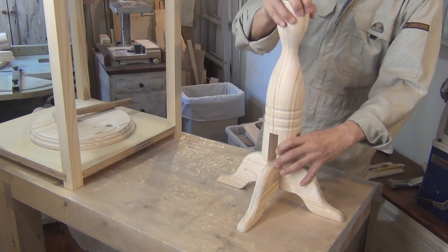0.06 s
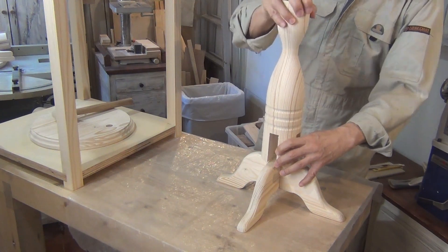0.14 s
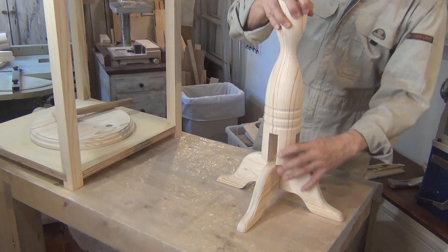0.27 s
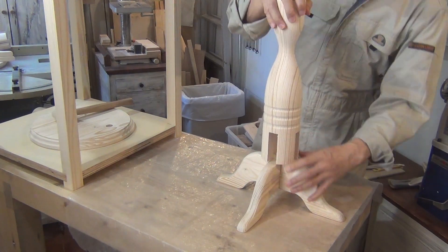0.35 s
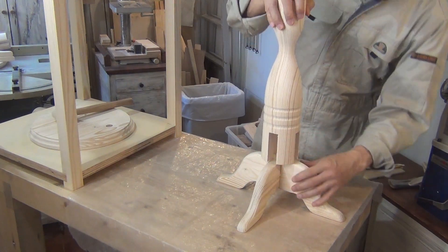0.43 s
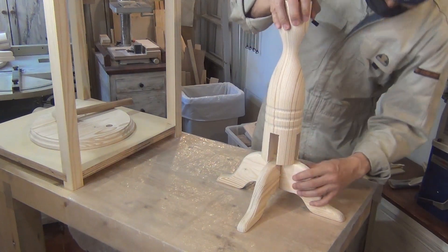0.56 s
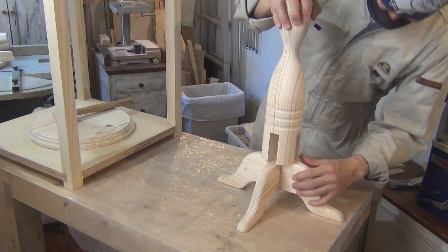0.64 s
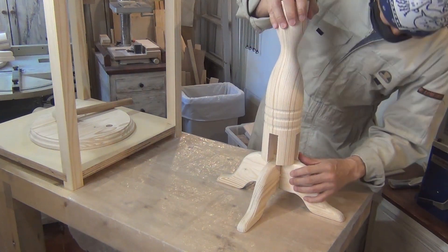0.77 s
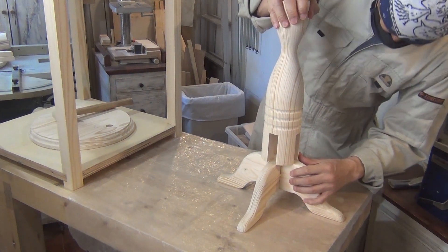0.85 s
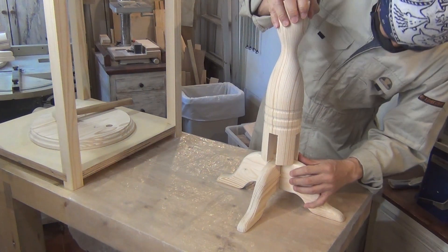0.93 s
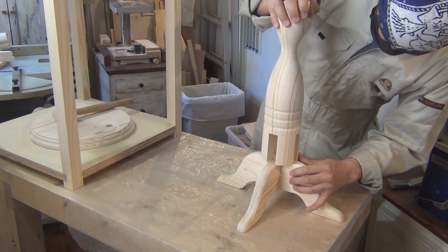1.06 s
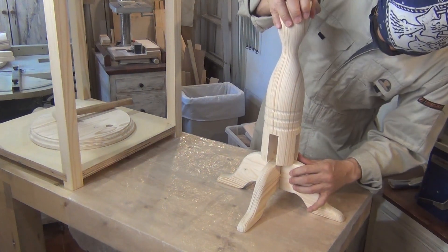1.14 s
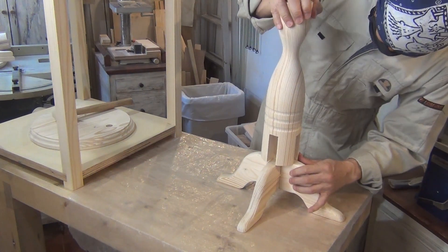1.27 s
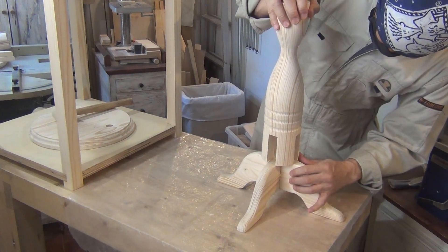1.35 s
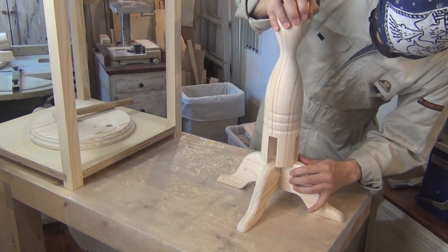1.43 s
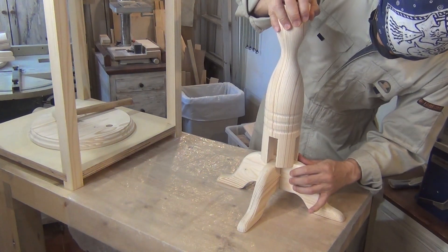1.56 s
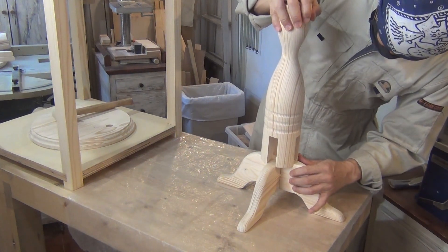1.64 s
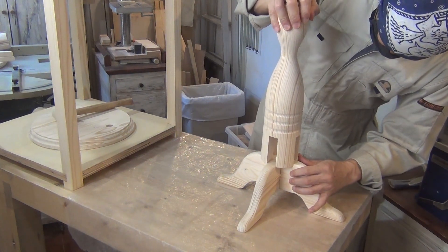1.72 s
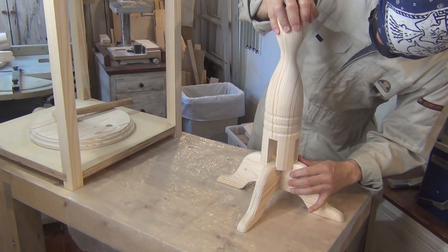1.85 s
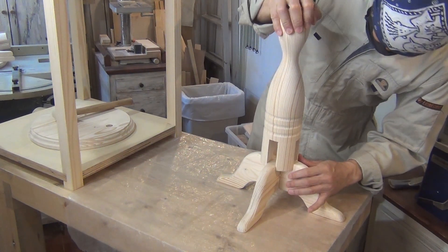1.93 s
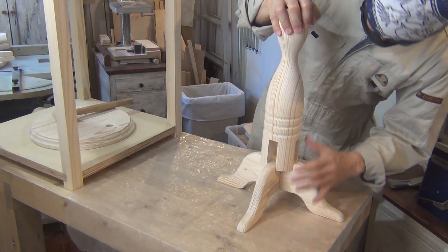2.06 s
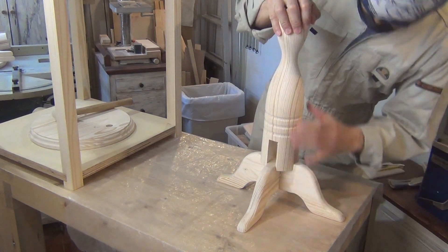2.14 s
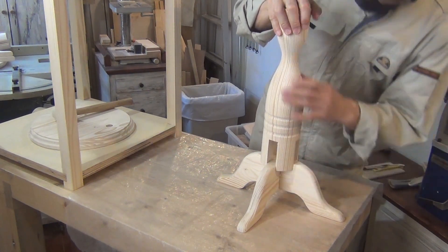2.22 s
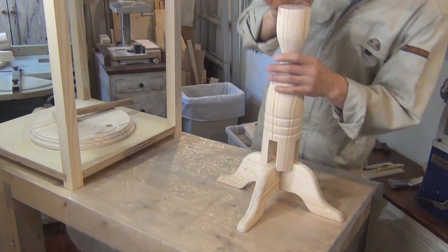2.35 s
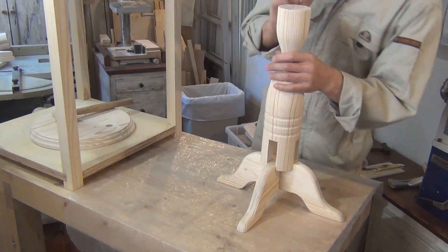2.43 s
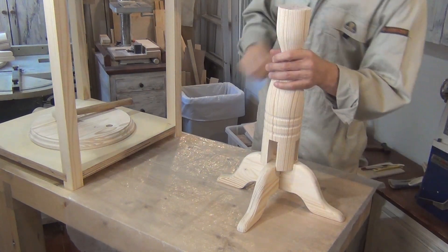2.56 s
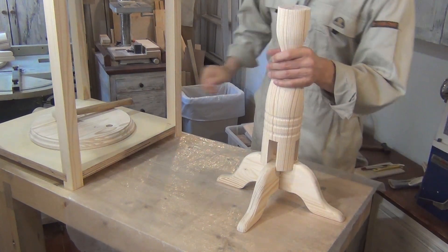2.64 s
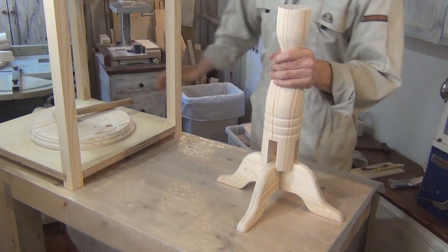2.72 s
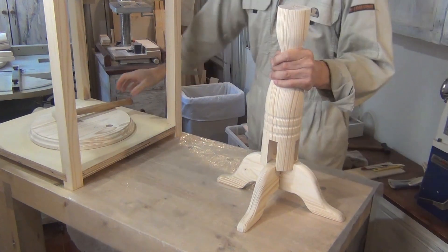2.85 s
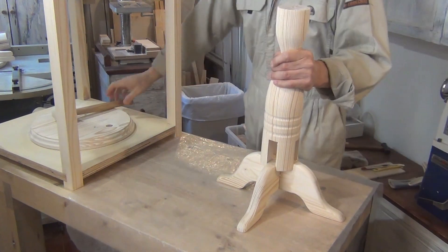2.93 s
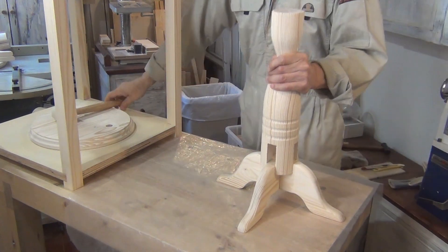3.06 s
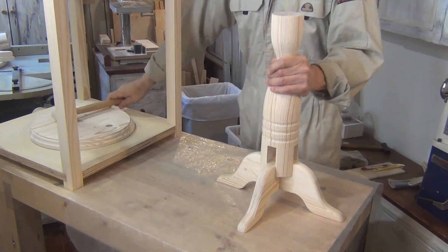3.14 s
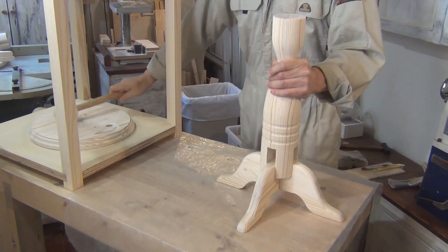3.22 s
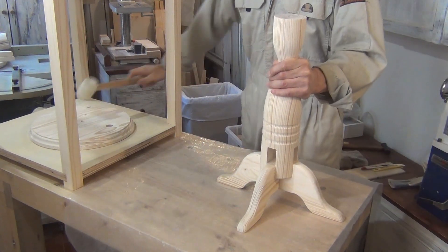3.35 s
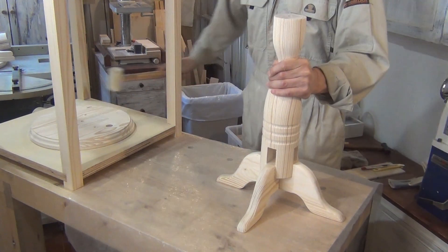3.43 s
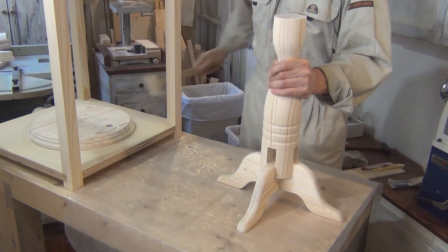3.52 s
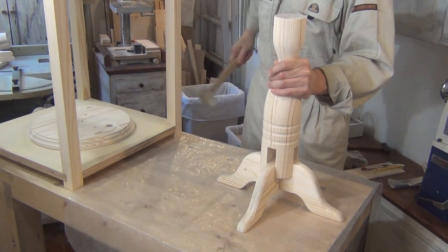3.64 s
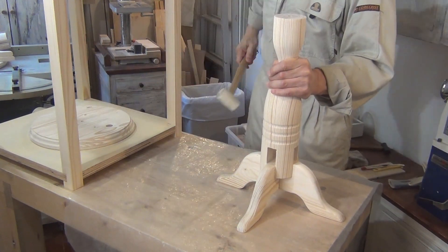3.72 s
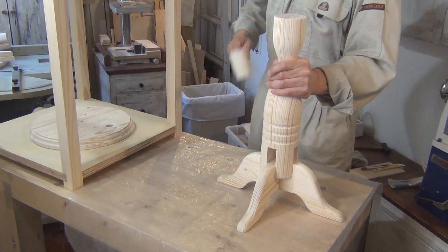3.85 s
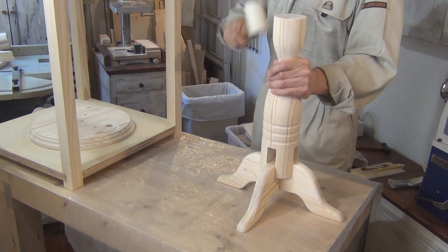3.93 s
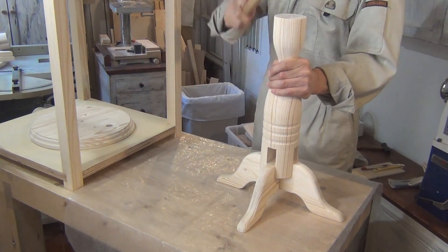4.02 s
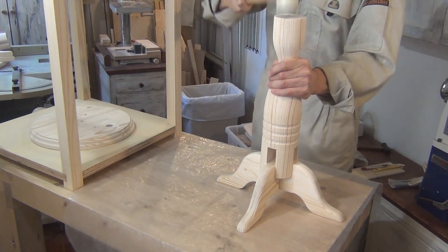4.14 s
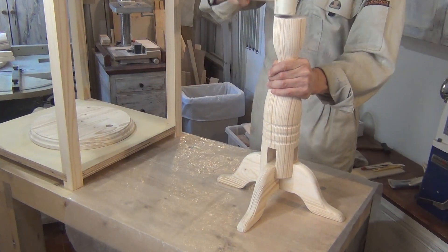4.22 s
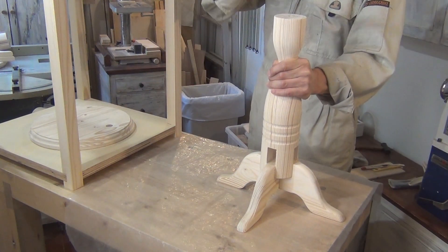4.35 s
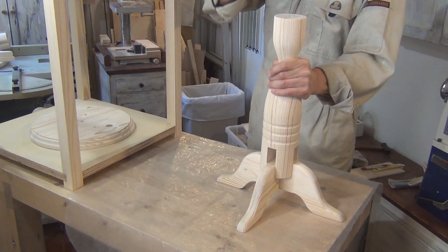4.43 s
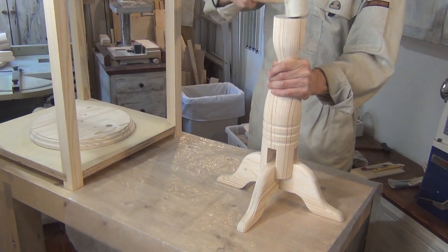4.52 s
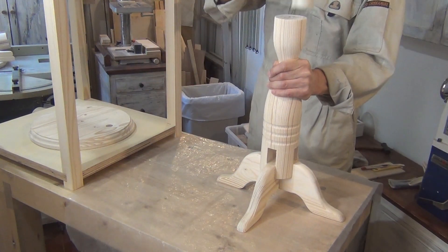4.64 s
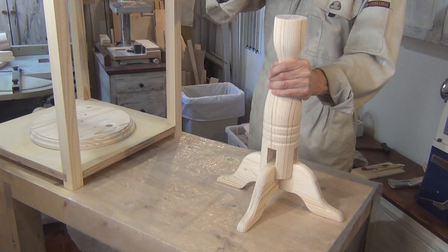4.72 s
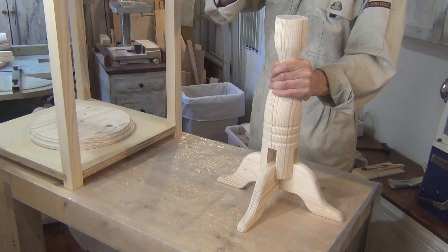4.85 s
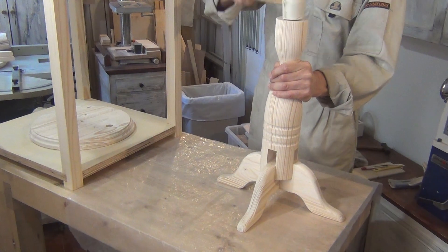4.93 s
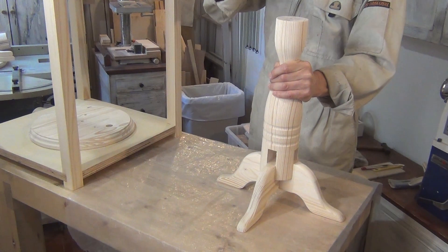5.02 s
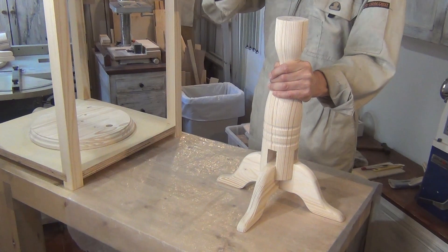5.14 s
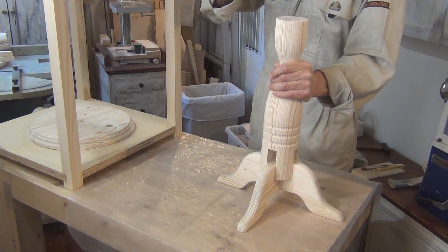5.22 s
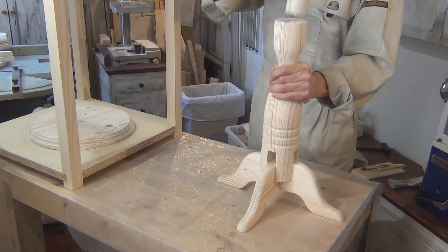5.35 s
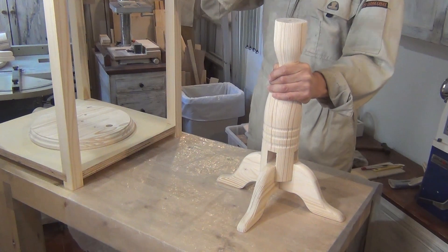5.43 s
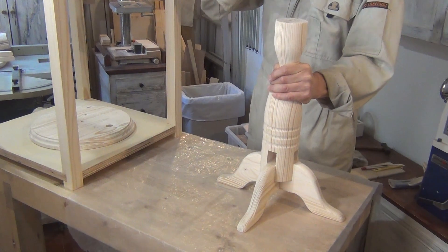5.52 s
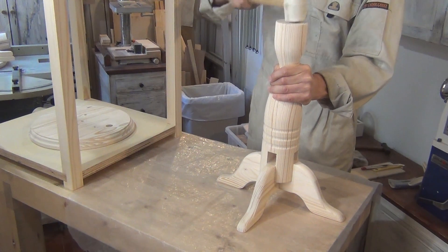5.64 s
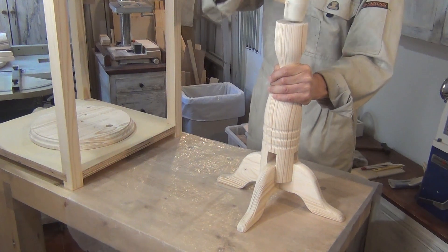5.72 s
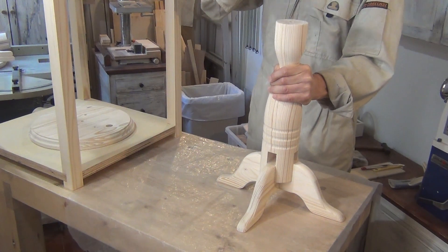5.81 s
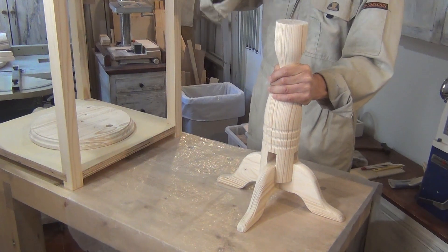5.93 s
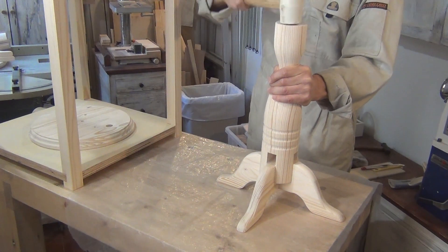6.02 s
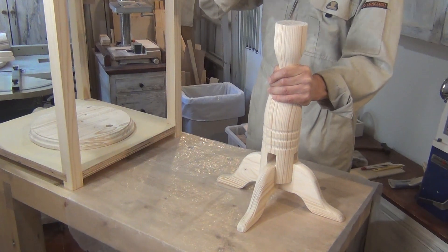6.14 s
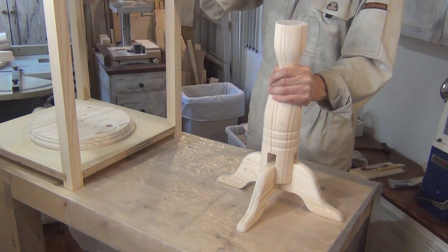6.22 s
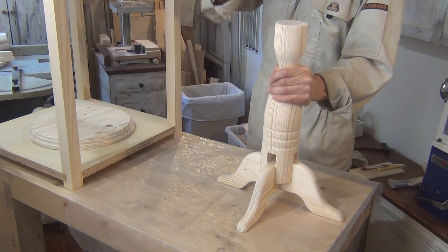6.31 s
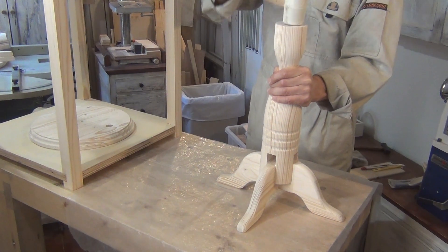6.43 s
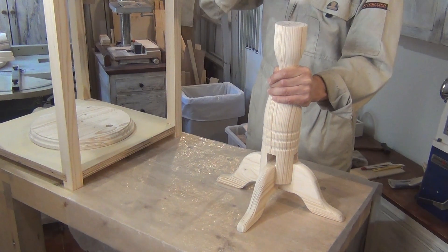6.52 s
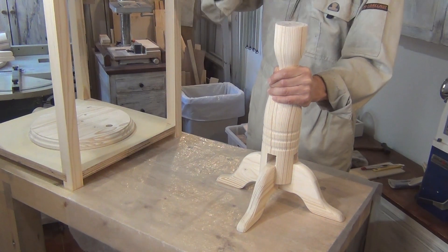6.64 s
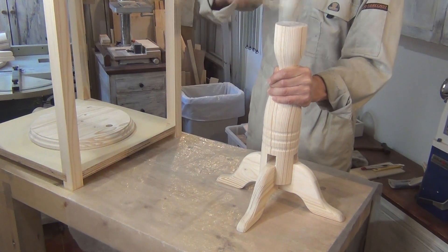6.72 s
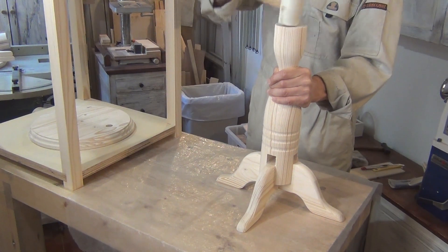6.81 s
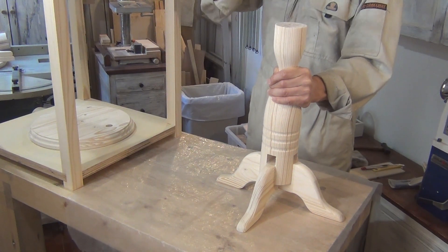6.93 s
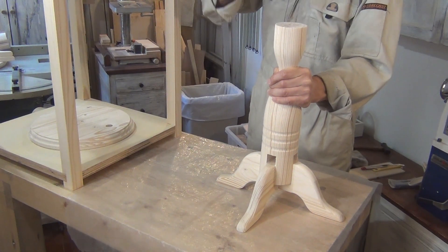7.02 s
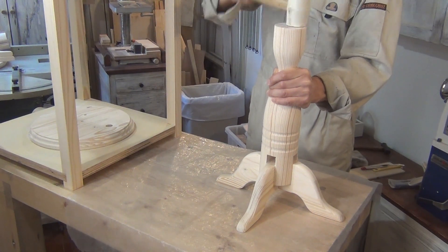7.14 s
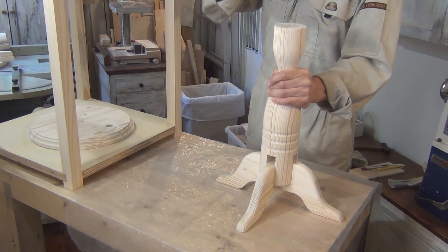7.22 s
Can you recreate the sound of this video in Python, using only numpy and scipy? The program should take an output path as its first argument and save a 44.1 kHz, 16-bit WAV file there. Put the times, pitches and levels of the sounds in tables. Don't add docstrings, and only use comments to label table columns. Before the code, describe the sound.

In a small humming workshop, soft brushing and short scrapes on wood give way to nine hard mallet knocks with faint steel ringing.

```python
import sys
import numpy as np
from scipy import signal
from scipy.fft import rfft, irfft, next_fast_len
from scipy.io import wavfile
from scipy.ndimage import uniform_filter1d, minimum_filter1d, map_coordinates

SR = 44100
rng = np.random.default_rng(int(sys.argv[2]) if len(sys.argv) > 2 else 0)


def bounce(signal):
    frames = np.transpose(np.atleast_2d(signal))
    limited = np.clip(frames, -1, 1)
    pcm = np.round(limited * 32767).astype(np.int16)
    wavfile.write(sys.argv[1], SR, pcm)


def volts_from_decibels(level):
    exponent = np.asarray(level, float) / 20
    return 10 ** exponent


N = 320607


def unit(x):
    return x / np.sqrt(np.mean(x ** 2) + 1e-20)


def along(points, hz):
    f, v = np.transpose(points)
    return np.interp(np.log(hz + 1), np.log(f + 1), v)


def curves(rows):
    s, *cols = np.transpose(rows)
    return [np.interp(np.arange(N) / SR, s, c) for c in cols]


def inside(rows):
    t = np.arange(N) / SR
    return np.clip(np.minimum(t - rows[0][0], rows[-1][0] - t) / 0.0077, 0, 1)


def wobble(rate, count=N):
    knots = rng.standard_normal(int(count * rate / SR) + 4)
    return map_coordinates(knots, [np.arange(count) * rate / SR])


def filtered(x, response):
    m = next_fast_len(x.shape[-1] + SR // 4)
    return irfft(rfft(x, m) * response(np.fft.rfftfreq(m, 1 / SR)), m)[..., :x.shape[-1]]


def resonances(peaks):
    def mode(f, k, centre, width, db):
        return (-1) ** k * volts_from_decibels(db) * 1j * f * width / (centre * centre - f * f + 1j * f * width)
    return lambda f: sum(mode(f, k, *peak) for k, peak in enumerate(peaks))


def spread(pair, width):
    side = filtered(pair[1], lambda hz: volts_from_decibels(along(width, hz)))
    return np.array([pair[0] + side, pair[0] - side])


def swells(rows, t):
    power = 0
    for s, db, rise_s, fall_s in rows:
        lapse = np.where(t < s, (s - t) / rise_s, (t - s) / fall_s)
        power = power + volts_from_decibels(2 * (db - 10 * lapse))
    return np.sqrt(power)


def grit(per_second, spread_db, count):
    draw = rng.random((2, 2, count))
    grains = (draw[0] < per_second / SR) * volts_from_decibels(-spread_db * np.log(draw[1] + 1e-3))
    return unit(grains * rng.standard_normal((2, count))) + 2.1 * rng.standard_normal((2, count))


def blows_so_far():
    t = np.arange(N) / SR
    return sum(1 - np.exp(-np.maximum(t - row[0], 0) / 0.15) for row in BLOWS)


# (f/Hz, level/dB per Hz)
MURMUR = [(12, -33), (24, -4), (40, 3), (103, -7.5), (164, -3.5), (205, -8.5), (320, -3), (594, -8),
          (906, -6.5), (1160, -11.5), (1580, -12.5), (1720, -15.5), (4000, -23), (5200, -28), (8800, -120)]
# (f/Hz, level/dB per Hz)
HISS = [(1180, -36), (2000, -10), (5690, -1.5), (7610, 0.5), (8810, -3), (14000, -6.5), (15000, -8),
        (15500, -7.5)]
# (t/s, f/Hz, level/dB)
DRONE = [(2.85, 79, -64), (3.1, 80, -68), (3.45, 77, -66), (3.85, 77.3, -57), (4.15, 77, -68),
         (4.4, 76.5, -53), (4.58, 76.5, -55), (4.9, 76.5, -62)]
# (f/Hz, level/dB)
TONES = [(37.7, -65), (1545, -78), (1572, -77), (7890, -83), (15735, -73), (15748, -79)]
# (f/Hz, side minus mid level/dB)
AIR_WIDTH = [(40, -5), (110, -7), (380, -14), (1200, -18), (1900, -20), (4500, -23), (5200, -11.5),
             (8800, -11.5), (10000, -32)]
MURMUR_DB, HISS_DB, HUM_DB, HISS_TOP_HZ = -53.5, -62, 5.5, 15850
QUIET_DB_PER_BLOW, SINK_DB_PER_BLOW = -.2, -.7


def background():
    landed = blows_so_far()
    murmur, hiss = (unit(filtered(rng.standard_normal((2, N)), lambda hz: volts_from_decibels(along(colour, hz))))
                    for colour in (MURMUR, HISS))
    murmur = volts_from_decibels(MURMUR_DB + QUIET_DB_PER_BLOW * landed + 0.47 * wobble(3.37)) * murmur
    air = murmur + volts_from_decibels(HISS_DB) * filtered(hiss, lambda hz: hz < HISS_TOP_HZ)
    motor_hz, motor_db = curves(DRONE)
    turn = 2 * np.pi * np.cumsum(motor_hz) / SR
    motor = inside(DRONE) * volts_from_decibels(motor_db + 5.0 + 1.3 * wobble(2.7)) * (np.sin(turn) + 0.29 * np.sin(2 * turn))
    t = np.arange(N) / SR
    hums = sum(volts_from_decibels(db + HUM_DB + .8 * wobble(7.2)) * np.sin(2 * np.pi * hz * t) for hz, db in TONES)
    return motor + volts_from_decibels(SINK_DB_PER_BLOW * landed) * (spread(air, AIR_WIDTH) + hums)


# (peak t/s, level/dB, rise t/s, fall t/s per 10 dB)
STROKES = [(.01, -55, .05, .07), (.3, -58, .022, .2), (.43, -54, .15, .22), (.615, -55.5, .03, .2),
           (.782, -54, .014, .07), (.91, -61, .07, .2), (1.22, -63, .02, .035), (1.37, -60, .035, .012),
           (1.45, -55, .013, .011), (1.52, -49.5, .022, .03), (1.735, -60, .03, .11), (1.91, -47, .07, .05),
           (1.963, -55, .006, .03), (2.26, -60, .08, .2), (2.375, -54, .012, .3), (2.55, -55, .3, .3),
           (2.89, -58, .07, .08), (3.104, -40, .005, .05), (3.13, -36.5, .022, .037),
           (3.24, -47, .07, .045), (3.36, -51.5, .07, .17), (3.56, -54, .05, .17), (4.0, -62, .25, .35)]
# (f/Hz, level/dB per Hz)
SKIN = [(1200, -10), (2500, -10.5), (3800, -5.5), (5600, -7.5), (6800, -4.5), (7700, -0.5), (8600, -6.5),
        (11000, -18.5), (16000, -32)]
# (t/s, peak level/dB)
TICKS = [
    (.785, -45),
    (1.9584, -36),
    (1.9612, -32),
    (3.033, -44),
    (3.077, -40),
]


def hands():
    until = round(BLOWS[1][0] * SR)
    cloth = lambda hz: volts_from_decibels(along(SKIN, hz) + 3.5 * np.exp(-((hz - 5000) / 160) ** 2))
    grain = filtered(grit(per_second=2500, spread_db=3.5, count=until), cloth)
    brush = swells(STROKES, np.arange(until) / SR) * volts_from_decibels(0.75 * wobble(40, count=until)) * unit(grain)
    hits = np.zeros(N)
    for s, peak_db in TICKS:
        hits[round(s * SR)] = volts_from_decibels(peak_db + 17)
    ticks = filtered(hits, resonances([(7400, 1100, 3.5), (4500, 1000, -7), (10800, 1800, -23)]))
    return np.pad(spread(brush, AIR_WIDTH), ((0, 0), (0, N - until))) + ticks


# (f/Hz, t60/s)
ROOM = [(60, 0.52), (150, 0.22), (500, 0.27), (1500, 0.31), (4000, 0.29), (8000, 0.27), (11000, .23),
        (15000, 0.29)]


def tail(colour, build_s):
    hz, t, z = signal.stft(filtered(rng.standard_normal((2, SR * 3 // 5)), colour), SR, nperseg=256)
    decay = volts_from_decibels(-60 * t / along(ROOM, hz)[:, None])
    answer = signal.istft(z * decay, SR, nperseg=256)[1]
    answer = answer * (1 - np.exp(-np.arange(answer.shape[1]) / SR / build_s))
    return answer / np.sqrt(np.mean(answer[0, :SR // 50] ** 2))


# (f/Hz, level/dB, t60/s)
WOOD = [(74, -13, .4), (135, -11, .27), (168, -1, .27), (256, -2, .25), (311, -4, .27), (348, -1, .28),
        (401, -2, .28), (463, -6, .27), (525, 1, .28), (596, -4, .26), (636, 2, .27), (690, 4, .13),
        (800, 2, .12), (765, 0, .28), (831, -3, .26), (896, -5, .26), (940, -7, .26), (1025, -5, .27),
        (1052, -5, .27), (1118, -8, .27), (1245, -9, .26), (1380, -9, .25), (1600, -12, .2),
        (2060, -11, .23), (3200, -17, .2), (4672, -17, .22)]


def wood_modes(t, blur_hz):
    hz, db, t60 = np.transpose(WOOD)[..., None]
    knots = rng.standard_normal((2, 2 * len(WOOD), int(t[-1] * 60) + 3))
    drift = [[np.interp(t * blur_hz, np.arange(len(row)), row) for row in part] for part in knots]
    waver = (0.38 + np.array(drift[0]) + 1j * np.array(drift[1])).reshape(2, len(WOOD), -1)
    waver = waver / np.sqrt(np.mean(np.abs(waver[..., :SR // 8]) ** 2, -1, keepdims=True))
    ring = np.imag(waver * np.exp(2j * np.pi * hz * t))
    return volts_from_decibels(db - 60 * t / t60) * ring * (1 - np.exp(-t / 0.002))


# (t/s, peak level/dB, hardness/dB per octave, thump level/dB, thump f/Hz)
KNOCKS = [
    (1.447, -18.5, -5.2, 4, 320),
    (2.474, -49, -7.5, 19, 140),
    (2.769, -44.5, -5.5, 21, 99),
]
# (t/s, strength level/dB, hardness/dB per octave, crack level/dB, topmost sizzle level/dB)
BLOWS = [
    (4.219, -14, 0.1, 4.2, -2),
    (4.583, -6.5, 1.52, 0.2, -9),
    (4.9476, -7.5, -0.52, 3, 4),
    (5.316, -5.5, 1.1, 10, -5),
    (5.701, -6.5, 2.6, -6, -7),
    (6.064, -6.5, 1.8, 9, -1.5),
    (6.432, -7.5, 2.28, 11, 0),
    (6.803, -7.5, 2.5, 6, 5),
    (7.148, -7.5, 0.54, -2, 0.2),
]
# (f/Hz, level/dB per Hz)
BLOW = [(26, -51), (45, -19), (75, -11.5), (194, -4.5), (394, 0), (516, -2.5), (597, -4), (762, -2.5),
        (2400, -16.5), (3290, -17.5), (4100, -20), (4980, -23), (5770, -25.5), (7540, -22), (15300, -57)]
# (f/Hz, side minus mid level/dB)
WIDTH = [(40, -4), (200, -18.5), (700, -18.5), (1300, -14.5), (2200, -22), (3500, -25), (4500, -30),
         (5000, -9.5), (8600, -13), (9600, -28), (15000, -26)]
LOOSE_DB, LOOSE_LEFT, SEATED_DB, SEATING_DB_PER_BLOW = 13, .25, -2.5, .85


def strikes():
    colour = lambda hz: volts_from_decibels(along(BLOW, hz) - 18 * np.exp(-((hz - 205) / 25) ** 2))
    same, out = tail(colour, build_s=0.0017), np.zeros((2, N + SR))
    t = np.arange(same.shape[1]) / SR
    modes = wood_modes(t, blur_hz=30.6)
    events = [(s, db - 14, hard_db, thump_db, -12, -4, hz) for s, db, hard_db, thump_db, hz in KNOCKS]
    for k, (s, db, hard_db, crack_db, top_db) in enumerate(BLOWS):
        thump_db = LOOSE_DB * LOOSE_LEFT ** k + SEATED_DB + SEATING_DB_PER_BLOW * k
        events.append((s, db, hard_db, thump_db, crack_db, top_db, 250))
    for s, db, hard_db, thump_db, crack_db, top_db, thump_hz in events:
        wood = volts_from_decibels(rng.normal(0, 2.76, len(WOOD))) @ modes
        ring = .5 * same + 0.21 * tail(colour, build_s=0.0026) + 0.27 * wood
        tilt = lambda f: hard_db * np.log2((f + 300) / 1000)
        thump = lambda f: thump_db * np.exp(-np.log2((f + 1) / thump_hz) ** 2 / 0.72)
        top = lambda f: top_db / (1 + (11000 / (f + 1)) ** 6)
        ring = filtered(ring, lambda f: volts_from_decibels(tilt(f) + thump(f) + top(f))) * (t > 0)
        snap = rng.standard_normal(ring.shape) * volts_from_decibels(-60 * t / 0.0071)
        face = resonances([(8020, 840, -1.0), (4570, 2100, -12.5), (11800, 1700, -27), (2470, 1360, -7.5)])
        crack = filtered(snap, face)
        out[:, round(s * SR):][:, :len(t)] += volts_from_decibels(db + 7) * (ring + volts_from_decibels(crack_db - 1) * crack)
    return spread(out[:, :N], WIDTH)


# (peak t/s, level/dB, rise t/s, fall t/s per 10 dB)
SLIDES = [
    [(2.411, -44, .002, .15), (2.5, -44.5, .07, .17)],
    [(3.268, -45, .004, .06), (3.318, -39.5, .05, .14), (3.7, -59, .15, .04)],
]
# (peak t/s, level/dB, rise t/s, fall t/s per 10 dB)
JOLTS = [
    [(2.425, -43, .01, .085), (2.565, -43, .07, .05), (2.778, -50, .016, .04)],
    [(3.27, -40, .006, .07), (3.318, -35.5, .05, .068), (3.73, -56, .04, .012)],
]
# (f/Hz, width/Hz, level/dB)
DRAG_HISS = [
    [(1360, 95, 2), (1620, 250, 4), (1920, 150, 5.5), (2270, 270, 6), (2490, 290, 6.5), (2760, 240, 6.5)],
    [(1414, 100, 3.5), (1780, 330, 3.5), (2130, 300, 5), (2626, 200, 4.5), (2860, 200, -23)],
]
# (f/Hz, width/Hz, level/dB)
DRAG_BODY = [
    [(165, 58, -3), (280, 55, -0.5), (390, 110, -0.5), (690, 99, -5), (970, 190, -6.5)],
    [(168, 63, -1.5), (355, 190, 1), (698, 170, 0.5), (837, 160, -3), (960, 110, -3.5), (1120, 76, -4)],
]


def dragging():
    out = np.zeros((2, N))
    for slides, jolts, surface, bench in zip(SLIDES, JOLTS, DRAG_HISS, DRAG_BODY):
        first = round(slides[0][0] * SR) - SR // 5
        t = (first + np.arange(SR)) / SR
        slips = grit(per_second=500, spread_db=1.5, count=SR) * volts_from_decibels(1.2 * wobble(70, count=SR))
        edge = lambda f: 1 / (1 + (f / 3200) ** 12)
        hiss, body = 0, 0
        for mode in surface:
            ring = filtered(slips, lambda f: resonances([mode])(f) ** 2 * edge(f))
            hiss = hiss + volts_from_decibels(wobble(30, count=SR)) * ring
        for mode in bench:
            ring = filtered(slips, lambda f: resonances([mode])(f) ** 2)
            body = body + volts_from_decibels(2.2 * wobble(25, count=SR)) * ring
        out[:, first:first + SR] += swells(slides, t) * unit(hiss) + swells(jolts, t) * unit(body)
    return spread(out, WIDTH)


RING_HZ, TWIN_HZ, FILE_HZ, RULE_HZ, CLAMP_HZ, PIN_HZ = 6648, 6632, 6368, 3074, 9680, 8700
# (t/s, f/Hz, level/dB, t60/s)
STEEL = [(3.3, PIN_HZ, -52, .4), (4.27, RING_HZ, -44, 0.7), (4.271, TWIN_HZ, -45, 1),
         (4.25, FILE_HZ, -31.5, 0.3), (4.3, RULE_HZ, -60, 1.5), (4.6, RING_HZ, -56, 1.2),
         (4.96, TWIN_HZ, -54.5, 1.5), (5.83, TWIN_HZ, -50.5, 0.92), (6.101, TWIN_HZ, -59, 0.9),
         (6.46, TWIN_HZ, -50, 0.96), (6.829, TWIN_HZ, -54, 1.8), (7.16, FILE_HZ, -38, 1.8),
         (7.16, CLAMP_HZ, -43, .8)]
# (t/s, level/dB)
BUZZ = [
    (4.95, -43),
    (5.32, -35),
    (5.703, -21),
    (6.066, -16.5),
    (6.434, -15.5),
    (6.806, -13.5),
    (7.15, -31),
]


def steel():
    out, t = np.zeros(N + SR), np.arange(SR * 3 // 4) / SR
    for s, hz, db, t60 in STEEL:
        note = volts_from_decibels(db - 60 * t / t60) * (1 - np.exp(-t / .012)) * np.sin(2 * np.pi * hz * t)
        out[round(s * SR):][:len(t)] += note
    blade = resonances([(5100, 260, 0), (4850, 260, -5)])
    for s, db in BUZZ:
        buzz = unit(filtered(rng.standard_normal(len(t)), lambda f: blade(f) ** 2))
        out[round(s * SR):][:len(t)] += volts_from_decibels(db - 60 * t / .27) * buzz
    return out[:N] * volts_from_decibels([[1.2], [-1.2]])


def scene():
    return background() + hands() + strikes() + dragging() + steel()


def band_limit(x):
    return signal.sosfilt(signal.butter(12, 16640, fs=SR, output="sos"), x)


def record(dry):
    ceiling, top, hold, ease = .52, .7, round(0.0066 * SR), round(0.00074 * SR)
    need = np.log(ceiling / np.maximum(np.abs(dry).max(0), ceiling))
    held = minimum_filter1d(need, hold, origin=(hold - 1) // 2)
    limited = dry * np.exp(uniform_filter1d(held, ease))
    rounded = limited / (1 + (limited / top) ** 6) ** (1 / 6)
    band = lambda hz: (1j * hz / (38 + 1j * hz)) ** 2 * (hz < 16300)
    mix = filtered(rounded, band)
    return band_limit(mix)


dry = scene()
out = record(dry)
bounce(out)
```